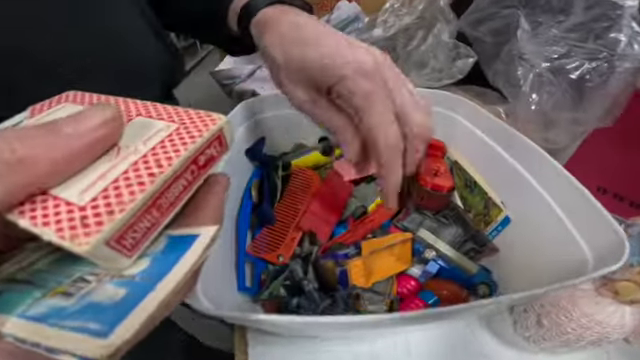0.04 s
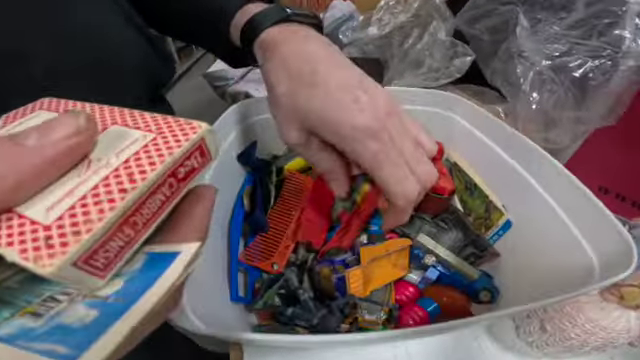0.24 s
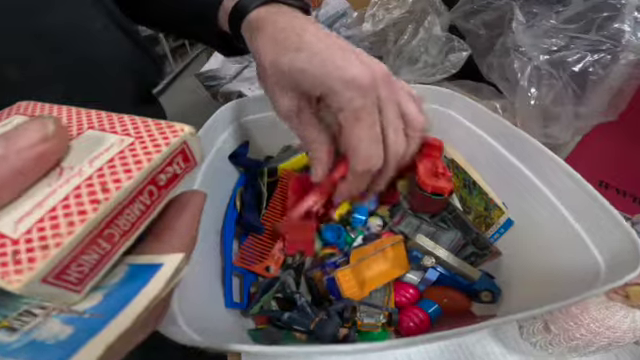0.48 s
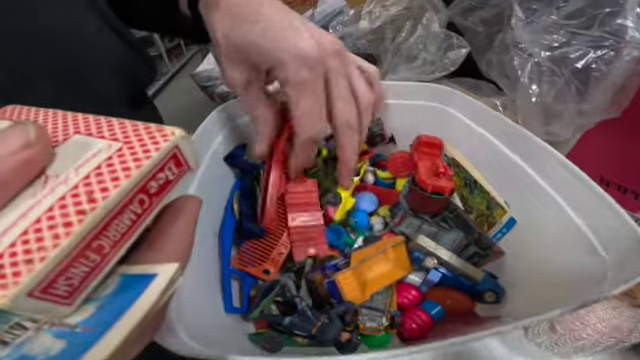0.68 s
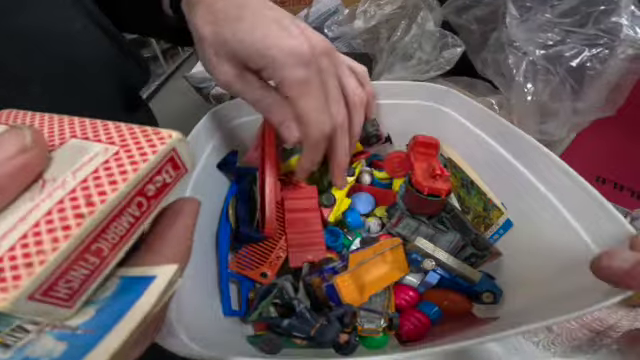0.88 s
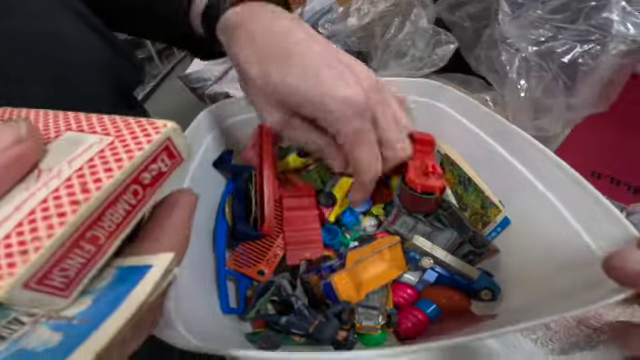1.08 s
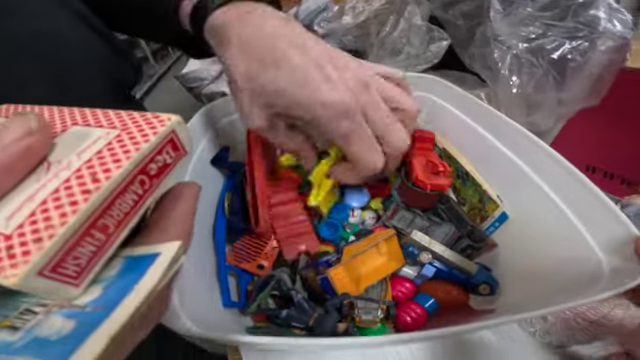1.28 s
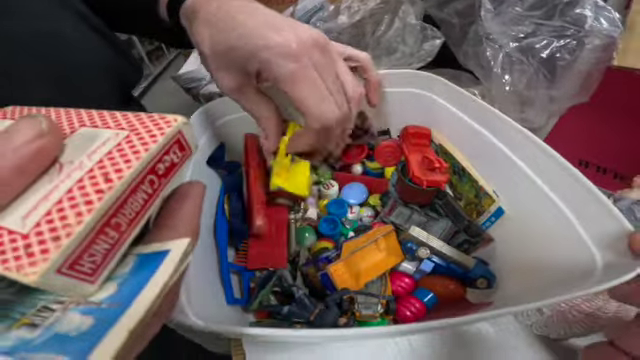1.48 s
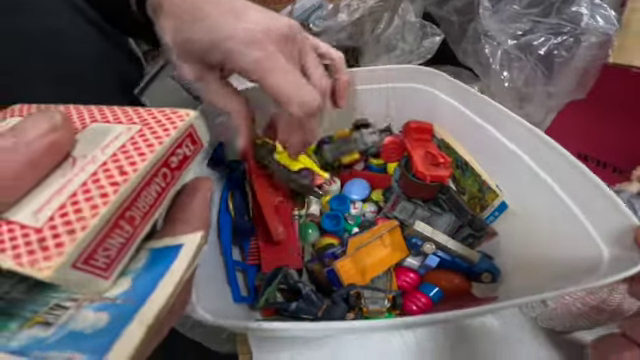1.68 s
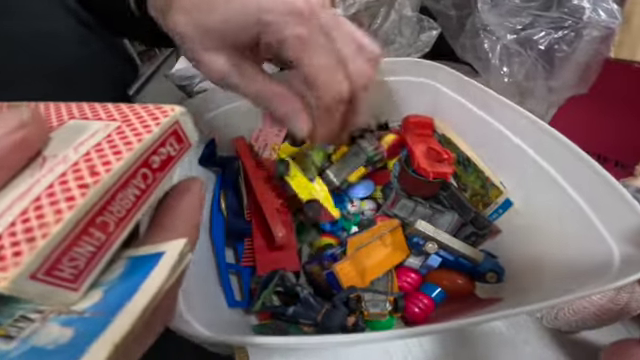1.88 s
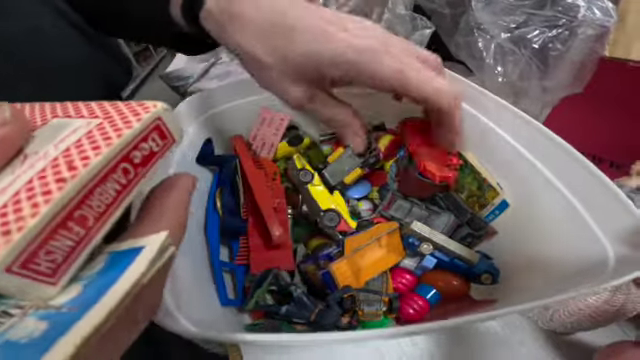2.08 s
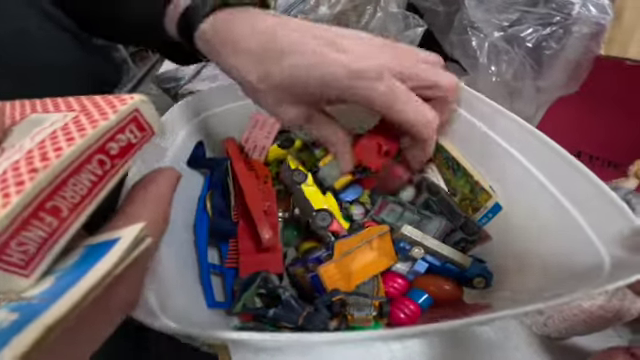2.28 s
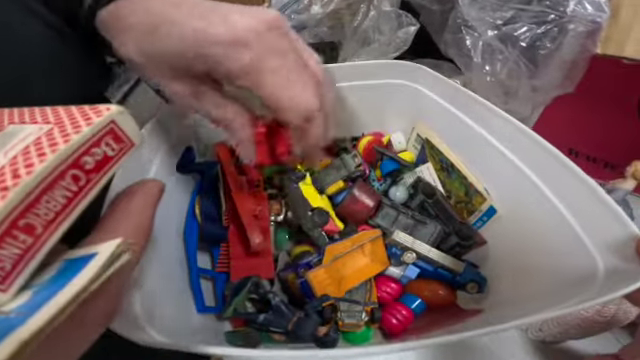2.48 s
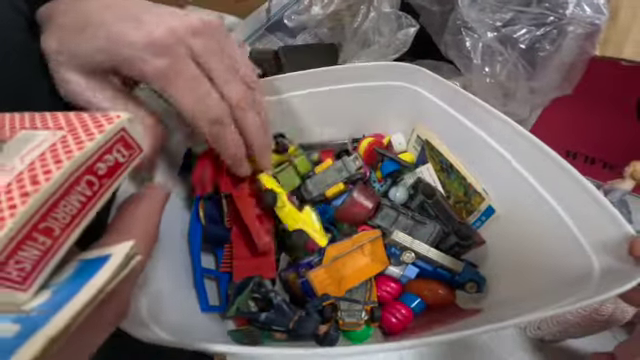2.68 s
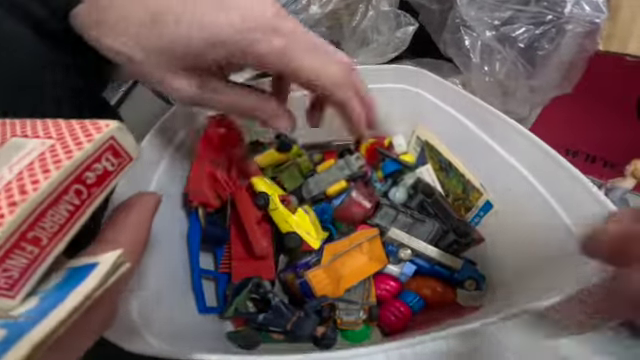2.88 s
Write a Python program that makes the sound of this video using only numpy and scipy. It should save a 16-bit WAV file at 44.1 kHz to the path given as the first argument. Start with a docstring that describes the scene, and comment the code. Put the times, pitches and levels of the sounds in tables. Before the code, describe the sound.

A hand rummages in a tub of little plastic toys, rattling, knocking and lightly clinking, close up

```python
"""In a small room, close to the microphones, a hand stirs small plastic toys and toy cars in a plastic tub.
Knocks are short damped modes and a crack of noise from a toy, with the ringing modes of the tub wall.
Between them many random light touches and a smooth rubbing noise drive the same rings: the jostling.
Hollow toys clack at a pitch, the tub's floor thumps in low modes and a small metal piece clinks.
The tub sits slightly right, with a faint short room tail over a low, steady hush of shaped noise."""
import sys
import numpy as np
from scipy import signal
from scipy.fft import rfft, irfft
from scipy.io import wavfile

SR = 44100
rng = np.random.default_rng(int(sys.argv[2]) if len(sys.argv) > 2 else 0)


def log_audio(samples):
    """Write samples as a 16-bit WAV file to the path given in sys.argv[1]."""
    # one column per channel
    frames = np.atleast_2d(samples).T
    # limit to full scale, then quantise
    limited = np.clip(frames, -1, 1)
    pcm = np.round(limited * 32767).astype(np.int16)
    wavfile.write(sys.argv[1], SR, pcm)


N = 130095

# Toys knocking each other and the tub, close by. Each row: start in seconds, tub wall level in dB,
# level of the toy's clack in dB, level of its edge's tick in dB; all before the layer trims.
KNOCKS = [(0.0766, -33, -52.5, -64), (0.2032, -38, -37, -38.5), (0.2274, -27, -20.5, -26.5),
          (0.2632, -30, -23.5, -27), (0.3125, -17.5, -29, -23), (0.3192, -16.5, -23.5, -18),
          (0.3275, -29, -28, -20), (0.3448, -20, -31, -23), (0.3606, -18.5, -23, -17),
          (0.3723, -30, -22, -20.5), (0.441, -58, -27, -51), (0.4547, -56, -22, -43),
          (0.5574, -41, -22.5, -25), (0.5859, -21, -21.5, -19.5), (0.6682, -31, -24, -23.5),
          (0.6889, -23, -17, -19), (0.7471, -24, -33, -36), (0.93, -32, -26.5, -28),
          (1.1015, -20.5, -26, -48), (1.1763, -18, -17, -20), (1.1999, -16, -21.5, -22),
          (1.216, -18, -30.5, -40), (1.2578, -36, -38, -20), (1.3267, -16, -33, -33),
          (1.3382, -17.5, -22.5, -25), (1.4035, -20.5, -23.5, -19), (1.411, -18, -26, -35),
          (1.4535, -18.5, -24, -22), (1.5103, -31, -22, -15.5), (1.519, -17, -53, -43),
          (1.5404, -21, -40, -20), (1.5919, -25, -27, -20), (1.6262, -19.5, -27, -24.5),
          (1.7053, -21, -21.5, -22), (1.7307, -25, -22, -21), (1.7626, -30.5, -36, -24.5),
          (1.838, -32.5, -22.5, -21.5), (1.846, -24, -18.5, -34), (1.8568, -22.5, -28, -30),
          (1.8654, -21, -15, -19), (1.9118, -30, -32, -25), (1.926, -50, -25, -22), (1.9403, -46, -27, -22),
          (1.9617, -33, -26.5, -32), (2.0012, -18.5, -17.5, -11), (2.0118, -20, -17.5, -32),
          (2.0445, -27, -25.5, -22.5), (2.1554, -28, -28.5, -40), (2.217, -32, -21, -24),
          (2.2332, -21.5, -17, -20), (2.26, -19, -24, -21.5), (2.2761, -39, -21, -23),
          (2.3754, -54, -21.5, -16.5), (2.408, -22.5, -34, -23), (2.4271, -29, -28, -19),
          (2.4413, -47, -33, -17), (2.4727, -25.5, -21, -15), (2.535, -22, -24, -25),
          (2.5562, -36, -24.5, -28), (2.5822, -18.5, -25, -15.5), (2.646, -46, -32.5, -29),
          (2.676, -32, -35.5, -23), (2.759, -36.5, -29, -42)]
# Jostling under the hand, levels joined by straight lines. Each row: time in seconds,
# level at the tub wall in dB, level among the toys in dB; both before the layer trims.
STIRS = [(0.01, -49.5, -72), (0.047, -19.5, -46), (0.096, -58, -80), (0.191, -55, -74), (0.21, -28, -41),
         (0.265, -21, -32.5), (0.336, -15.5, -21.5), (0.44, -24, -31), (0.543, -26.5, -36.5),
         (0.595, -22.5, -33.5), (0.633, -30.5, -37.5), (0.678, -17, -33), (0.718, -26, -39),
         (0.765, -24.5, -36), (0.844, -40.5, -59), (0.871, -19.5, -34.5), (0.91, -46, -54),
         (0.941, -31, -45.5), (1.053, -32.5, -51), (1.11, -21.5, -35), (1.18, -19.5, -29),
         (1.309, -20.5, -29.5), (1.413, -17.5, -32.5), (1.476, -28.5, -39), (1.549, -13, -26),
         (1.694, -33, -42.5), (1.716, -20.5, -32), (1.828, -33, -38), (1.866, -35, -37.5),
         (1.94, -24.5, -32), (1.99, -31.5, -44), (2.009, -31.5, -27), (2.075, -33.5, -46),
         (2.129, -37.5, -47.5), (2.159, -30, -29), (2.199, -34.5, -47.5), (2.26, -25.5, -24.5),
         (2.348, -23.5, -35), (2.42, -22, -18), (2.478, -25, -30), (2.574, -40, -44.5), (2.592, -22, -24.5),
         (2.635, -36.5, -39), (2.682, -28.5, -34.5), (2.808, -41.5, -47.5), (2.894, -33.5, -44),
         (2.949, -54, -63)]
# Hollow toys clacking. Each row: start in seconds, level in dB, pitch in Hz.
HOLLOWS = [(0.263, -17.5, 988), (.668, -25.5, 1015), (.688, -28.5, 1036), (0.748, -23.5, 1086),
           (1.162, -20, 1000), (1.189, -18, 986), (1.227, -20.5, 995), (1.328, -22.5, 925),
           (2.28, -21, 2450)]
# The load dropping on the tub's floor. Each row: start in seconds, level in dB before the layer trim.
THUMPS = [(0.264, -26.5), (0.323, -25), (0.363, -27), (0.868, -31.5), (1.198, -26.5), (1.403, -28),
          (1.523, -21.5), (1.542, -24.5), (1.555, -16.5), (2.005, -19.5)]
# Strikes on the metal piece. Each row: start in seconds, level in dB before the layer trim,
# most excited frequency in Hz, free ringing before it is damped in seconds.
CLINKS = [(1.238, -35.5, 7500, 0.0037), (1.453, -20, 7270, 0.0023), (2.2333, -20, 8250, 0.11),
          (2.294, -34, 6300, 0.042), (2.442, -29.5, 9860, 0.12), (2.444, -23.5, 1690, 0.032),
          (2.4708, -25, 8900, 0.036), (2.536, -42, 5630, 0.025), (2.6456, -26, 6070, 0.03),
          (2.648, -34.5, 1720, 0.021)]
# Modes of the metal piece, tub walls and tub floor, nominal before each blow's random changes.
# Each row: frequency in Hz, relative level in dB, time to decay by 60 dB in seconds.
METAL_MODES = [(1690, 1, .19), (4505, 3, .15), (4867, 1, .13), (6305, -4, .16), (7760, 0, .11),
               (9470, -8, .1), (9630, -6, .14), (10290, -8, .16), (12000, -9, .16), (13710, -15, .18),
               (14370, -17, .2)]
WALL_MODES = [(340.4, -1, 0.019), (424, -2.5, 0.046), (488.2, -4, 0.04), (541.5, -0.5, 0.044),
              (626.3, 2.5, 0.026), (833, 3.5, 0.013), (953, -3, 0.024), (993, -3, 0.038), (1053, 0, 0.038),
              (1176, -6, 0.044), (1429, 6, 0.011)]
FLOOR_MODES = [(81.4, -11.5, 0.15), (103, 2, 0.086), (145, -1, 0.023), (172, 5.5, 0.069),
               (226, -4.5, 0.085)]
# Ring of the toys' bodies (clack) and edges (tick). Each row: frequency in Hz, relative level in dB.
CLACK_COLOUR = [(1350, -11), (1700, 4), (3200, 1), (4600, -4)]
TICK_COLOUR = [(4400, 6), (7800, 1.5), (10500, -10), (13000, -22.5), (15000, -34)]
# Placing of the tub in stereo. Each row: frequency in Hz, left over right in dB.
PAN = [(100, -2.9), (600, -1.5), (2800, -2.5), (10000, -0.2)]
# Spectrum of the room's hush. Each row: frequency in Hz, relative level in dB per Hz.
HUSH = [(20, -4.5), (40, -8.5), (105, -3.5), (220, -13.5), (1000, -69), (3000, -54.5), (15000, -70)]

RING_TIME = np.arange(int(0.22 * SR)) / SR   # seconds since a contact
STRIKE_SAMPLES = int(0.008 * SR)             # opening stretch over which a ring's level is set
SIDES = np.array([[1], [-1]])                # left, right

# Toys and tub: nominal decays (to -60 dB) and build-ups in seconds.
CLACK_T60_S, TICK_T60_S, CRACK_T60_S = 0.011, 0.013, 0.012
TOY_ATTACK_S, WALL_ATTACK_S = 0.0012, 0.0016
RING_SPREAD = 0.13         # spread of the toys' decay times, natural log
CRACK_SHARE = 0.56         # noise crack against the modes
BOUNCE_S, BOUNCE_SHARE = 0.0035, 0.52   # mean gap; strength of each touch against the last
PAN_SPREAD_DB = 0.76       # toy-to-toy spread of left over right

# Layer trims in dB.
WALL_DB, CLACK_DB, TICK_DB, THUMP_DB, CLINK_DB = -5.5, -4, -6, -2.5, 2
STIR_WALL_DB, STIR_CLACK_DB, STIR_TICK_DB = -8.5, -2.5, -7.5


def from_db(db):
    """Decibels to gain."""
    return 10 ** (np.asarray(db) / 20)


def rms_one(x):
    """Scale to rms 1."""
    return x / np.sqrt(np.mean(x ** 2) + 1e-20)


def strike_one(x):
    """Scale a ring to rms 1 over its first moments."""
    return x / np.sqrt(np.mean(x[:STRIKE_SAMPLES] ** 2) + 1e-20)


def at_hz(points, hz):
    """Read a spectrum in dB on a log-frequency axis."""
    f, db = np.transpose(points)
    return np.interp(np.log(np.maximum(hz, 1)), np.log(f), db)


def shaped(noise, gain):
    """Give noise a spectrum: one gain per frequency bin."""
    return irfft(rfft(noise) * gain, noise.shape[-1])


def fade(t, t60):
    """Exponential decay, 60 dB down after t60 seconds."""
    return np.exp(-np.log(1000) * t / t60)


def add(out, s, sound):
    """Mix a sound in at time s."""
    i = int(s * SR)
    out[..., i:i + sound.shape[-1]] += sound[..., :N - i]


def swell(sound, attack_s):
    """A contact builds up over a moment as the parts settle against each other."""
    return strike_one(sound * (1 - np.exp(-RING_TIME / attack_s)))


def ring(hz, db, t60):
    """Damped sines, each with a chance phase; together they start at about rms 1."""
    envelopes = from_db(db)[:, None] * fade(RING_TIME, t60[:, None])
    power = np.sum(np.mean(envelopes[:, :STRIKE_SAMPLES] ** 2, axis=1)) / 2
    cycles = hz[:, None] * RING_TIME + rng.random((len(hz), 1))
    return np.sum(envelopes * np.sin(2 * np.pi * cycles), axis=0) / np.sqrt(power + 1e-20)


def placed(sound):
    """Put a sound somewhere in the tub, a little left or right."""
    return sound * from_db(rng.normal() * PAN_SPREAD_DB / 2 * SIDES)


def tub(modes, attack_s=WALL_ATTACK_S, vary_db=2.0, detune=0.03):
    """One blow rings the tub's modes; the shifting load changes each mode a little."""
    hz, db, t60 = np.transpose(modes)
    pitch_change, level_change = rng.standard_normal((2, len(hz)))
    sound = ring(hz * (1 + detune * pitch_change), db + vary_db * level_change, t60)
    sound = sound * (1 - np.exp(-RING_TIME / attack_s))
    # energy of a signal of rms 1 lasting two strike stretches (16 ms)
    return sound / np.sqrt(np.sum(sound ** 2) / (0.016 * SR))


def toy(colour, t60, count, vary_db=7.0):
    """One plastic toy: a noise crack and short modes at pitches of its own."""
    low, high = colour[0][0], colour[-1][0]
    hz = low + (high - low) * (np.arange(count) + rng.random(count)) / count
    db = at_hz(colour, hz) + vary_db * rng.standard_normal(count)
    modes = ring(hz, db, t60 * np.exp(RING_SPREAD * rng.standard_normal(count)))
    f = np.linspace(0, SR / 2, len(RING_TIME) // 2 + 1)
    in_band = (f > low) & (f < high)
    noise = shaped(rng.standard_normal(len(RING_TIME)), from_db(at_hz(colour, f)) * in_band)
    crack = strike_one(noise * fade(RING_TIME, CRACK_T60_S))
    return swell(modes + CRACK_SHARE * crack, TOY_ATTACK_S)


def bounced(sound, count=3):
    """A contact chatters: quick further touches, each weaker than the last."""
    out, lag = sound.copy(), 0
    for k in range(1, count + 1):
        lag += int(BOUNCE_S * (0.5 + rng.random()) * SR)
        out[lag:] += BOUNCE_SHARE ** k * rng.choice([-1, 1]) * sound[:len(sound) - lag]
    return strike_one(out)


def hush(level_db=-40.5, side_db=-20):
    """The room's background: shaped noise, nearly the same in both channels."""
    f = np.linspace(0, SR / 2, N // 2 + 1)
    mid, side = rms_one(shaped(rng.standard_normal((2, N)), from_db(at_hz(HUSH, f))))
    return from_db(level_db) * (mid + from_db(side_db) * side * SIDES)


def room(x, tail_t60=0.03, tail_db=-13.5, scatter_hz=12200, scatter_t60=0.00083, scatter_db=-3.5):
    """A faint short tail and a scatter of the top treble off the tub's walls, different at each ear."""
    t = np.arange(SR // 2) / SR
    tail = rng.standard_normal((2, len(t))) * fade(t, tail_t60)
    scatter = rng.standard_normal(len(t)) * fade(t, scatter_t60)
    highpass = signal.butter(4, scatter_hz, "high", fs=SR, output="sos")
    scatter = signal.sosfilt(highpass, scatter / np.linalg.norm(scatter))
    response = from_db(tail_db) * tail / np.linalg.norm(tail[0])
    response = response + from_db(scatter_db) * scatter * SIDES
    return signal.oaconvolve(x, response, axes=1)[:, :N]


def thumps():
    """The tub's floor booms briefly in its low modes under the load."""
    out = np.zeros(N)
    for s, db in THUMPS:
        add(out, s, from_db(db + THUMP_DB) * tub(FLOOR_MODES, attack_s=0.0035))
    return out


def hollows(t60=0.032, attack_s=0.0036):
    """A hollow toy gives a brief pitched clack: one damped mode."""
    out = np.zeros(N)
    for s, db, hz in HOLLOWS:
        clack = ring(np.array([hz]), np.zeros(1), np.array([t60]))
        add(out, s, from_db(db) * swell(clack, attack_s))
    return out


def clinks(falloff_db_per_octave=45, deepest_db=22, damped_t60=0.028, attack_s=0.00091):
    """The metal piece rings, coloured by where it is hit and slightly detuned, until a neighbour damps it."""
    out = np.zeros(N)
    hz, mode_db, t60 = np.transpose(METAL_MODES)
    for s, db, centre_hz, free_s in CLINKS:
        loss_db = np.minimum(falloff_db_per_octave * np.abs(np.log2(hz / centre_hz)), deepest_db)
        detune = 1 + 0.0027 * rng.standard_normal(len(hz))
        damping = fade(np.maximum(RING_TIME - free_s, 0), damped_t60)
        sound = ring(hz * detune, mode_db - loss_db, t60) * damping
        add(out, s, from_db(db + CLINK_DB) * swell(sound, attack_s))
    return out


def jostling(count=24, touches_per_s=650, touch_spread_db=5, slide_share=0.27):
    """Many light touches and some sliding, dealt among the toys, follow the hand's strokes."""
    time = np.arange(N) / SR
    s, wall_db, toys_db = np.transpose(STIRS)
    wall_gain = from_db(np.interp(time, s, wall_db) + STIR_WALL_DB)
    toys_gain = from_db(np.interp(time, s, toys_db))
    sizes = from_db(touch_spread_db * np.clip(rng.standard_normal(N), -2, 2))
    touches = rms_one(sizes * (rng.random(N) < touches_per_s / SR))
    contacts = rms_one(touches + slide_share * rng.standard_normal(N))
    dealt = rng.integers(0, count, N)
    out = np.zeros((2, N))
    for k in range(count):
        rings = tub(WALL_MODES), toy(CLACK_COLOUR, CLACK_T60_S, count=7), toy(TICK_COLOUR, TICK_T60_S, count=16)
        wall, clack, tick = [r / np.linalg.norm(r) for r in rings]
        body = from_db(STIR_CLACK_DB) * clack + from_db(STIR_TICK_DB) * tick
        own = contacts * (dealt == k)
        out += signal.oaconvolve(own * wall_gain, wall)[:N]
        out += placed(signal.oaconvolve(own * toys_gain, body)[:N])
    return out


def knocks():
    """Each knock rings a toy's body and edge, chattering, and the wall behind it."""
    out = np.zeros((2, N))
    for s, wall_db, clack_db, tick_db in KNOCKS:
        clack = from_db(clack_db + CLACK_DB) * bounced(toy(CLACK_COLOUR, CLACK_T60_S, count=12))
        tick = from_db(tick_db + TICK_DB) * bounced(toy(TICK_COLOUR, TICK_T60_S, count=24))
        wall = from_db(wall_db + WALL_DB) * tub(WALL_MODES)
        add(out, s, placed(clack) + placed(tick) + wall)
    return out


def scene():
    """The tub, close and slightly to the right, over the room's low hush."""
    direct = thumps() + hollows() + clinks() + jostling() + knocks()
    f = np.linspace(0, SR / 2, N // 2 + 1)
    toys = shaped(direct + room(direct), from_db(SIDES * at_hz(PAN, f) / 2))
    return hush() + toys


def record(dry, ceiling=0.7, cutoff_hz=16300):
    """Peaks are rounded towards the ceiling, then the top treble is cut steeply."""
    rounded = ceiling * np.tanh(dry / ceiling)
    lowpass = signal.cheby2(12, 70, cutoff_hz, fs=SR, output="sos")   # 70 dB down from the cutoff up
    return signal.sosfilt(lowpass, rounded)


dry = scene()
out = record(dry)
log_audio(out)
```